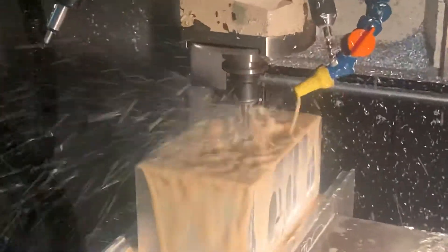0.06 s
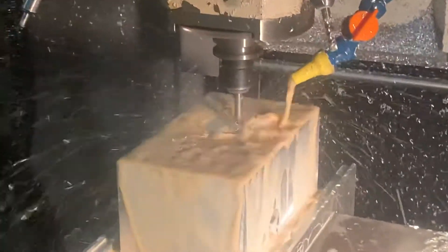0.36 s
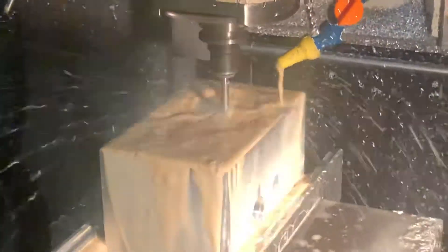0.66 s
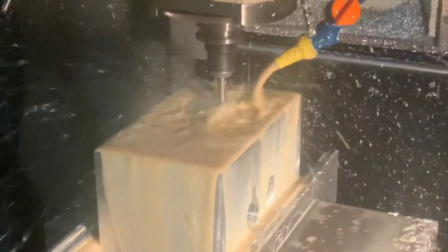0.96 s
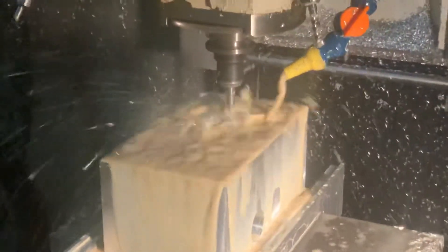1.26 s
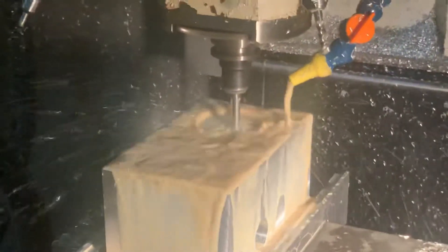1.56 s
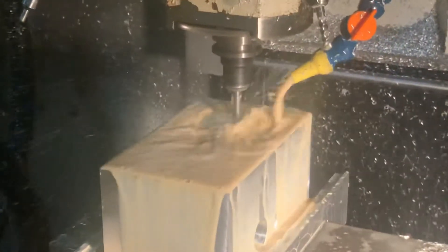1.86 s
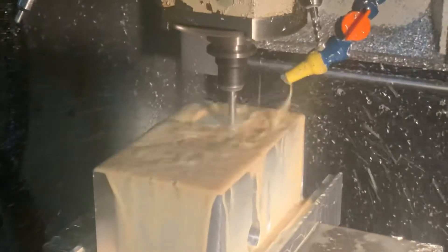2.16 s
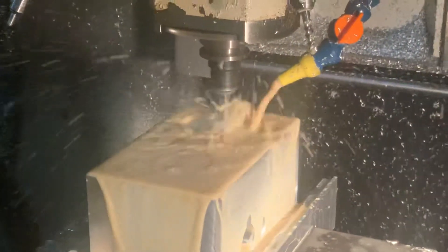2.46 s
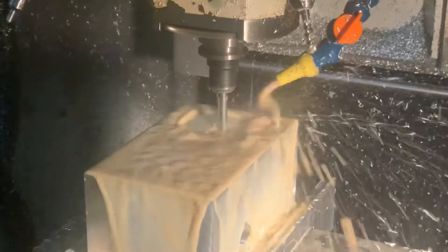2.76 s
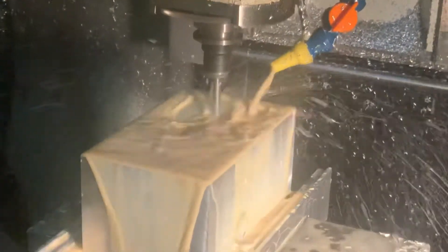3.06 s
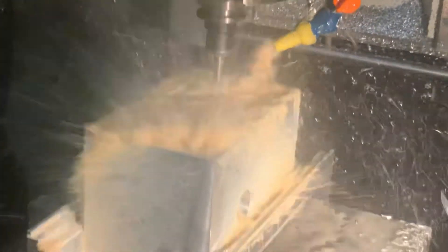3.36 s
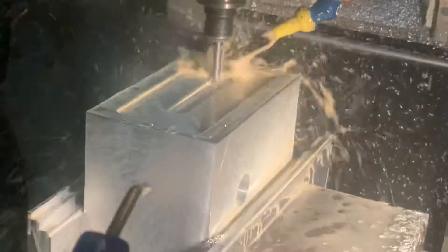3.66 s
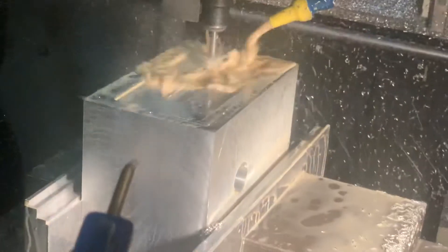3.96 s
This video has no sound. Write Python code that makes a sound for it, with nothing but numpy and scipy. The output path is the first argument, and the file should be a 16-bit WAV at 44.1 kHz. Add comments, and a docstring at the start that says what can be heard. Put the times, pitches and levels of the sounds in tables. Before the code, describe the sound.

A milling machine cuts a metal block close by, with a steady drone, a thin high whistle, light scraping and ringing, and a fast low throb. Flung coolant hisses throughout. From about 2 seconds the cutter briefly sings out several times. At 3.2 seconds an air gun starts a much louder, bright hiss that lasts until the end at 4 seconds, blowing coolant away with a splutter around 3.5 seconds.

```python
"""A steady drone with a whistle and a wet hiss: a milling machine cuts a metal block under coolant.
The spindle sounds harmonics (orders) of about 200 turns a second, and its drive whistles. The cutter's
teeth add higher orders that sing out now and then, chips ring the metal, and flung coolant hisses.
Near the end an air gun blasts the pool off the block, and the gain control of a nearby camera,
which picks up the sound through two microphone ports, turns everything down."""
import sys
import numpy as np
from scipy import signal
from scipy.fft import rfft, irfft, next_fast_len
from scipy.io import wavfile
from scipy.ndimage import uniform_filter1d, map_coordinates

SR = 44100
rng = np.random.default_rng(int(sys.argv[2]) if len(sys.argv) > 2 else 0)


def wrap_up_sound(samples):
    """Save the sound to the file named by the first command line argument, as 16-bit audio."""
    columns = np.atleast_2d(samples).T
    # keep every value between -1 and 1, then stretch to whole-number steps
    tamed = np.clip(columns, -1, 1)
    steps = np.round(tamed * 32767).astype(np.int16)
    wavfile.write(sys.argv[1], SR, steps)


N = 176400

# tones of pumps and fans (frequency [Hz], level [dB], waver [dB])
MOTOR_TONES = [(40.2, -64.5, 1), (70.7, -62, 3.5), (118.4, -62, 2.5), (220, -58.5, -1.5), (290.4, -60, 7),
               (311.5, -61.5, 1.5), (352, -60.5, -1), (525, -59.5, 4.5)]
# slow swell of the bass (time [s], relative level [dB])
BASS_SWELL = [(0, -3), (.8, -1), (2.3, 1), (2.9, 2.5), (3.4, 0.5), (3.7, 1.5), (4, 2)]
# resonances of a pump stroke (delay [s], frequency [Hz], half-width [s], level [dB], swell share [ratio])
PUMP_MODES = [(-0.0012, 63, 0.017, -50.5, 2.5), (-.003, 132.4, .014, -44.5, 0.45),
              (-0.035, 182, 0.014, -43, .1), (-0.019, 300, 0.0095, -50, .1)]
# noise spectra (frequency [Hz], relative density [dB])
RUMBLE_SPECTRUM = [(20, -24), (45, -7), (70, -11), (100, -6), (190, -4), (260, -1.5), (380, -4), (520, -8),
                   (720, -13.5), (1100, -16), (2500, -29), (6000, -58)]
SPRAY_SPECTRUM = [(300, -56), (1000, -6.5), (1600, -8), (2300, -3.5), (3300, -2.5), (4100, 1.5), (5600, -3),
                  (6400, -3), (7300, -5), (9000, -5), (12000, -3.5), (14500, -4), (15600, -51)]
JET_SPECTRUM = [(300, -22), (1500, -21.5), (2300, -19.5), (3000, -14), (3500, -11), (5000, -11.5),
                (7500, -2.5), (9500, -1), (10450, 4), (11100, 1), (12500, 5.2), (13300, 5.5), (14300, 2.5),
                (15600, -1)]
SPLASH_SPECTRUM = [(60, -12), (150, 5), (260, -22), (360, 5), (410, 2.5), (460, 11.5), (540, -12),
                   (700, -9), (1300, -5.5), (2500, -15), (4200, -6), (8000, -14)]
SCRAPE_SPECTRUM = [(600, -45), (1500, -25), (2250, -4), (2430, 9.5), (2660, 8.5), (2850, -8.5), (4000, -41),
                   (8000, -50)]
# envelopes of the air jet and of the coolant it blows away (time [s], level [dB])
JET_LEVEL = [(3.2, -19.5), (3.25, -13), (3.285, -17), (3.33, -16), (3.42, -14), (3.51, -13), (3.56, -15),
             (3.78, -15.5), (3.84, -17), (4, -18.5)]
SPLASH_LEVEL = [(3.2, -61), (3.25, -40.5), (3.33, -56), (3.41, -52.5), (3.48, -33.5), (3.56, -49),
                (3.75, -45.5), (4, -58)]
# envelopes of the three lowest spindle orders and the drive's whistle (time [s], level [dB])
ORDER_1_LEVEL = [(0, -46), (1.9, -45), (2.35, -45), (2.85, -45.5), (3.1, -40.5), (3.35, -46), (4, -46)]
ORDER_2_LEVEL = [(0, -46), (.9, -44.5), (1.7, -46.5), (2.3, -44.5), (2.8, -44), (3.05, -47.5), (4, -54)]
ORDER_3_LEVEL = [(0, -53.5), (1.3, -51.5), (1.55, -56.5), (1.9, -59), (2.15, -49), (2.27, -47), (2.33, -66),
                 (2.44, -66), (2.5, -48.5), (2.62, -51.5), (2.76, -55), (2.9, -55.5), (3.05, -47.5),
                 (3.3, -51.5), (4, -53)]
WHISTLE_LEVEL = [(0, -51), (.6, -47.5), (.95, -48), (1.1, -54), (1.25, -47), (1.72, -46), (2.1, -52),
                 (2.55, -55), (2.8, -46.5), (3.2, -44), (4, -45)]
# envelopes of the tool's scraping and the metal's ringing (time [s], level [dB])
SCRAPE_LEVEL = [(0, -46), (.8, -45), (1.4, -44), (2, -45), (2.7, -46), (4, -49)]
RING_LEVEL = [(0, -48.5), (1.2, -44.5), (2.2, -45.5), (3, -41.5), (4, -52)]
# resonances of tool and block (frequency [Hz], bandwidth [Hz], relative level [dB])
METAL_MODES = [(3510, 78, -20), (4320, 220, 0), (5070, 160, 4), (5460, 200, -6), (6070, 200, 1.5),
               (6400, 49, 7), (6670, 58, 2)]
# spectral envelope of the teeth's orders (frequency [Hz], level before the bite gain [dB])
TEETH_SPECTRUM = [(800, -71), (1000, -69), (1400, -66), (1600, -69), (2000, -64.5), (2200, -66),
                  (2400, -54.5), (2600, -53), (2950, -56), (3400, -75), (4200, -83), (5000, -68),
                  (6600, -67)]
# how hard the teeth bite (time [s], gain [dB])
BITE_GAIN = [(0, 0.5), (1.2, 3), (2, 2.5), (3, 4.5), (4, 7.5)]
# single orders that sing out (centre [s], duration [s], order [number], level [dB])
SINGING_ORDERS = [(1.98, .6, 9, -54.8), (1.95, .55, 7, -58), (1.95, .36, 10, -59.5), (2.18, .26, 6, -61),
                  (2.52, .18, 6, -53.5), (2.58, .12, 10, -52.5), (2.58, .1, 9, -56), (3.03, .14, 8, -52.5),
                  (3.1, .16, 10, -54), (3.18, .07, 8, -55)]
# likeness of the noise at the two ports (frequency [Hz], correlation [0-1])
PORT_CORRELATION = [(60, .95), (150, .8), (450, .75), (1400, .6), (2200, .35), (4100, .08), (6400, .45),
                    (7300, .4), (9000, .78), (15000, .86)]
# phase between the ports, in general and added at a standing wave's node (frequency [Hz], left lead [rad])
PORT_LEAD = [(200, 0), (400, -.8), (600, -1), (900, .5), (1400, 0), (1950, 0), (2300, 2.3), (5300, 3.6),
             (6100, 6.6), (6700, 6.3)]
NODE_LEAD = [(70, 0), (130, .9), (200, 1.9), (265, 3.4), (275, -2.6), (400, 0)]
# the moving camera's nearness to that node (time [s], nearness [0-1])
NODE_NEARNESS = [(0, .2), (2.3, .25), (2.9, .9), (4, 1)]
# balance of the ports (frequency [Hz], left minus right [dB])
PORT_BALANCE = [(400, 0), (1400, -2), (3000, -0.3), (5500, -2), (9000, 0)]

SPINDLE_HZ, SPEED_WANDER = 199.7, 0.00041  # wander as a fraction of the speed
WHISTLE_HZ, BEAT_HZ, BEAT_SHARE = 7798, 10, 0.26
PUMP_HZ, FIRST_STROKE_S, STROKE_SCATTER_DB = 10.045, .097, 0.15
SPRAY_DB, SPRAY_RISE_DB_PER_S, DROPS_RELATIVE_DB, DROPS_PER_S = -39.5, 1.2, -17.5, 1700
VALVE_OPENS_S, VALVE_ATTACK_S = 3.195, .014
PORT_LAG_S, LAG_FROM_HZ = .0002956, 6770
AGC_THRESHOLD_DB, AGC_SLOPE, AGC_TIME_S, BAND_LIMIT_HZ = -26.5, 0.61, 0.46, 15750
TIME = np.arange(N) / SR


def amp(db):
    """Decibels to amplitude ratio."""
    return 10 ** (np.asarray(db) / 20)


def unit(x):
    """Normalisation to rms 1."""
    return x / np.sqrt(np.mean(x ** 2) + 1e-20)


def along(points, hz):
    """Interpolation of (frequency, value) points on a logarithmic axis."""
    frequencies, values = np.transpose(points)
    return np.interp(np.log(hz + 1), np.log(frequencies + 1), values)


def curve(points):
    """Linear interpolation of (time, value) points at every sample."""
    return np.interp(TIME, *np.transpose(points))


def wobble(rate):
    """Smooth random modulation: a spline through `rate` Gaussian knots a second."""
    return map_coordinates(rng.standard_normal(int(N * rate / SR) + 4), [TIME * rate])


def tone(cycles):
    """A sinusoid of rms 1 with random initial phase."""
    return np.sqrt(2) * np.sin(2 * np.pi * (cycles + rng.random()))


def filtered(x, response):
    """Linear filtering: the spectrum is multiplied by a complex frequency response."""
    size = next_fast_len(N + SR // 4)
    return irfft(rfft(x, size) * response(np.fft.rfftfreq(size, 1 / SR)), size)[..., :N]


def coloured(pair, spectrum):
    """Partial coherence: two independent signals, shaped as mid and side, give stereo of rms 1."""
    def response(hz):
        angle = np.arccos(np.clip(along(PORT_CORRELATION, hz), -1, 1)) / 2
        return amp(along(spectrum, hz)) * [np.cos(angle), np.sin(angle)]
    mid, side = filtered(pair, response)
    return unit(np.array([mid + side, mid - side]))


def rush(spectrum, patchy_db):
    """Modulated stereo noise of rms 1: its gain varies in random patches of time and frequency."""
    cells = signal.stft(rng.standard_normal((2, N)), nperseg=512)[2]
    patches = uniform_filter1d(rng.standard_normal(cells.shape[1:]), size=7, axis=0)
    patches = uniform_filter1d(patches, size=8, axis=1)
    pair = signal.istft(cells * amp(patchy_db * unit(patches)), nperseg=512)[1][:, :N]
    return coloured(pair, spectrum)


def machinery():
    """Periodic and random vibration: pumps and fans hum over the rumble of the enclosure."""
    hum = sum(amp(db + waver_db * wobble(14)) * tone(hz * TIME + 0.022 * wobble(5.84))
              for hz, db, waver_db in MOTOR_TONES)
    rumble = amp(-50 + curve(BASS_SWELL) / 2) * rush(RUMBLE_SPECTRUM, patchy_db=1.0)
    return hum + rumble


def pump():
    """Periodic excitation: each stroke, probably of the coolant pump, swells low resonances in turn."""
    throb = np.zeros(N)
    for delay, hz, half_width, db, swell_share in PUMP_MODES:
        strokes = (TIME - FIRST_STROKE_S - delay) * PUMP_HZ
        from_peak_s = ((strokes + .5) % 1 - .5) / PUMP_HZ
        level_db = db + swell_share * curve(BASS_SWELL) + STROKE_SCATTER_DB * wobble(PUMP_HZ)
        envelope = np.exp(-(from_peak_s / half_width) ** 2) * np.cos(np.pi * PUMP_HZ * from_peak_s)
        throb += amp(level_db) * envelope * np.sin(2 * np.pi * hz * from_peak_s)
    return throb


def coolant():
    """Shot noise: fine drops strike at random within the slowly growing hiss of flung coolant."""
    impacts = (rng.random((2, N)) < DROPS_PER_S / SR) * rng.standard_normal((2, N))
    level_db = SPRAY_DB + SPRAY_RISE_DB_PER_S * TIME + 0.28 * wobble(12.33)
    hiss = rush(SPRAY_SPECTRUM, patchy_db=1.5)
    drops = amp(DROPS_RELATIVE_DB) * coloured(impacts, SPRAY_SPECTRUM)
    return amp(level_db) * (hiss + drops)


def air_gun():
    """Jet noise: the valve releases a bright, fluttering rush that sweeps the pool off with a splutter."""
    valve = np.clip((TIME - VALVE_OPENS_S) / VALVE_ATTACK_S, 0, 1)
    jet_db = curve(JET_LEVEL) + 0.5 * wobble(51) + .55 * wobble(600)
    jet = amp(jet_db) * rush(JET_SPECTRUM, patchy_db=2.5)
    splutter = amp(curve(SPLASH_LEVEL) + 2.6 * wobble(70)) * rush(SPLASH_SPECTRUM, patchy_db=4.0)
    return valve * (jet + splutter)


def spindle(turns, waver_db=.8, jitter_cycles=.017):
    """Rotation harmonics: three orders drone, a nearby tone beats with the lowest, the drive whistles."""
    drone = sum(amp(curve(level) + waver_db * wobble(18)) * tone(k * (turns + jitter_cycles * wobble(24.12)))
                for k, level in enumerate((ORDER_1_LEVEL, ORDER_2_LEVEL, ORDER_3_LEVEL), 1))
    neighbour = BEAT_SHARE * amp(curve(ORDER_1_LEVEL)) * tone(turns + BEAT_HZ * TIME)
    whistle_db = curve(WHISTLE_LEVEL) + 2.5 * wobble(14)
    whistle = amp(whistle_db) * tone(WHISTLE_HZ * TIME + 0.055 * wobble(29.9))
    return drone + neighbour + whistle


def metal_ring():
    """Modal resonance: chips excite the damped modes of tool and block with a random force."""
    def response(hz):
        return sum((-1) ** k * amp(db) * 1j * hz * width / (mode_hz ** 2 - hz ** 2 + 1j * hz * width)
                   for k, (mode_hz, width, db) in enumerate(METAL_MODES))
    return amp(curve(RING_LEVEL)) * unit(filtered(rng.standard_normal((2, N)), response))


def tool_scrape(turns, flutter_db=1.1, pulse_depth=0.11):
    """Amplitude modulation: scraping noise at the tool's main resonance pulses once a turn."""
    envelope = amp(flutter_db * wobble(50)) * (1 + pulse_depth * tone(turns))
    return amp(curve(SCRAPE_LEVEL)) * unit(envelope * rush(SCRAPE_SPECTRUM, patchy_db=1.47))


def cutter_teeth(turns, waver_db=3.5):
    """Forced vibration: the teeth buzz at high orders, and single ones sing out as the cut changes."""
    buzz = np.zeros(N)
    for order in range(4, 34):
        level_db = along(TEETH_SPECTRUM, order * SPINDLE_HZ) + waver_db * wobble(5.79)
        buzz += amp(level_db) * tone(order * turns + 0.032 * wobble(22.27))
    singing = np.zeros(N)
    for centre, duration, order, db in SINGING_ORDERS:
        swell = np.sqrt(np.clip(1 - (2 * (TIME - centre) / duration) ** 2, 0, 1))
        singing += amp(db + 4.1 * wobble(50)) * swell * tone(order * turns + .045 * wobble(40))
    return amp(curve(BITE_GAIN)) * buzz + singing


def phase_split(radians):
    """A phase difference shared between the ports: left advances by half, right lags by half."""
    return np.exp(.5j * np.array([radians, -radians]))


def standing_wave(sound):
    """Interference in the enclosure: near a node, low notes reach the two ports out of phase."""
    nearness = np.clip(curve(NODE_NEARNESS), 0, 1)
    at_node = filtered(sound, lambda hz: phase_split(along(NODE_LEAD, hz)))
    return (1 - nearness) * sound + nearness * at_node


def port_response(hz):
    """Spaced reception: the two ports differ in phase and level, depending on frequency."""
    lead = along(PORT_LEAD, hz) - 2 * np.pi * PORT_LAG_S * np.maximum(hz - LAG_FROM_HZ, 0)
    balance = amp(along(PORT_BALANCE, hz) * np.array([[.5], [-.5]]))
    return phase_split(lead) * balance


def scene():
    """Superposition: all sources add and reach the two ports a little out of step."""
    turns = np.cumsum(SPINDLE_HZ * (1 + SPEED_WANDER * wobble(4.08))) / SR
    milling = spindle(turns) + cutter_teeth(turns) + tool_scrape(turns) + metal_ring()
    sound = milling + machinery() + pump() + coolant() + air_gun()
    return filtered(standing_wave(sound), port_response)


def record(dry):
    """Automatic gain control: level above a threshold slowly lowers the gain; a low-pass follows."""
    power = np.abs(uniform_filter1d(np.mean(dry ** 2, axis=0), size=441))  # 10 ms mean
    excess_db = np.maximum(10 * np.log10(power + 1e-12) - AGC_THRESHOLD_DB, 0)
    step = 1 / (AGC_TIME_S * SR)
    smoothed_db = signal.lfilter([step], [1, step - 1], excess_db)
    return filtered(dry * amp(-AGC_SLOPE * smoothed_db), lambda hz: hz < BAND_LIMIT_HZ)


dry = scene()
out = record(dry)
wrap_up_sound(out)
```